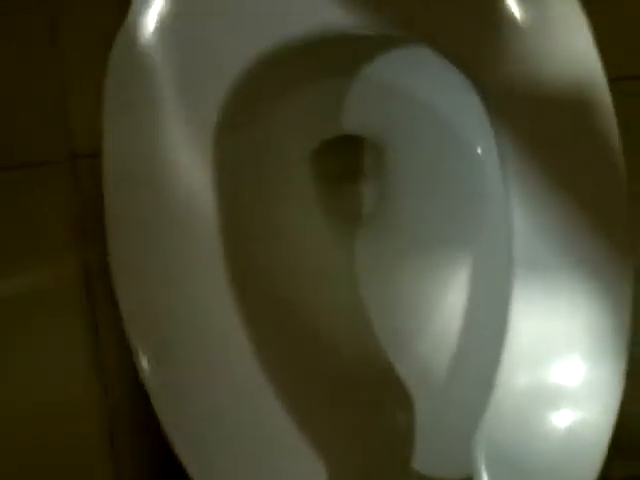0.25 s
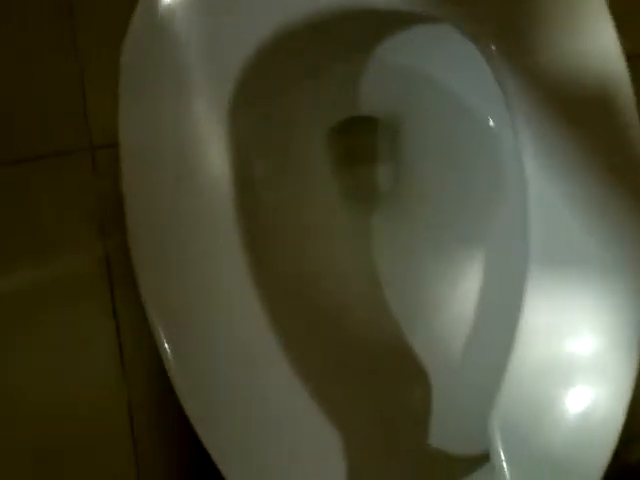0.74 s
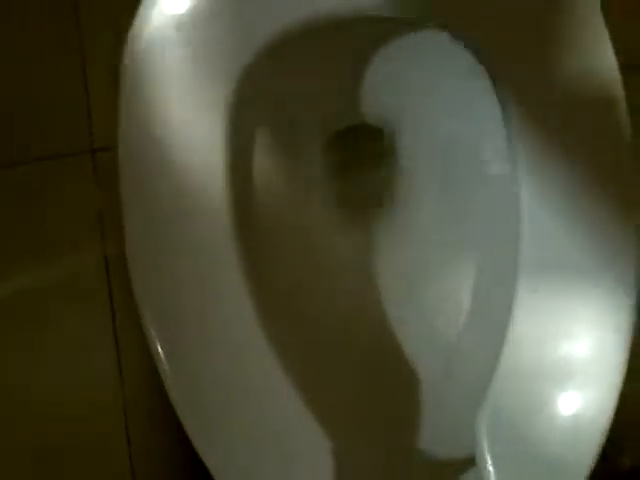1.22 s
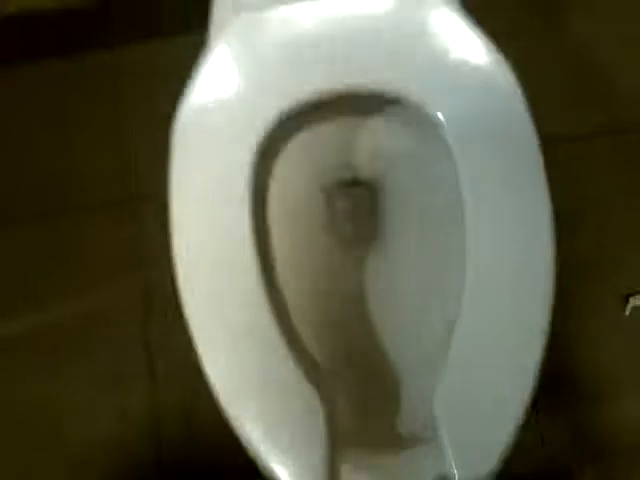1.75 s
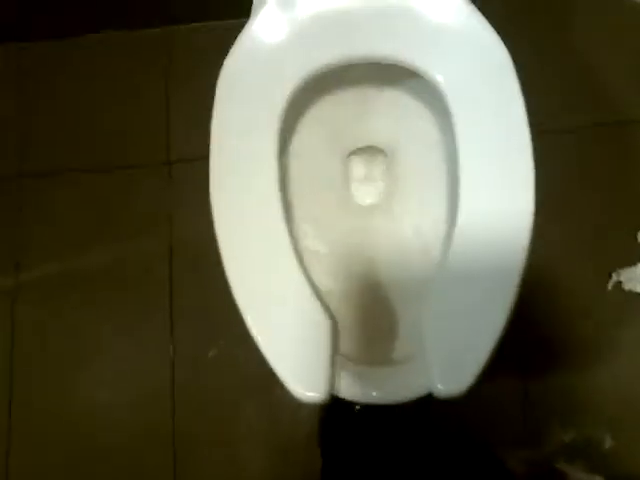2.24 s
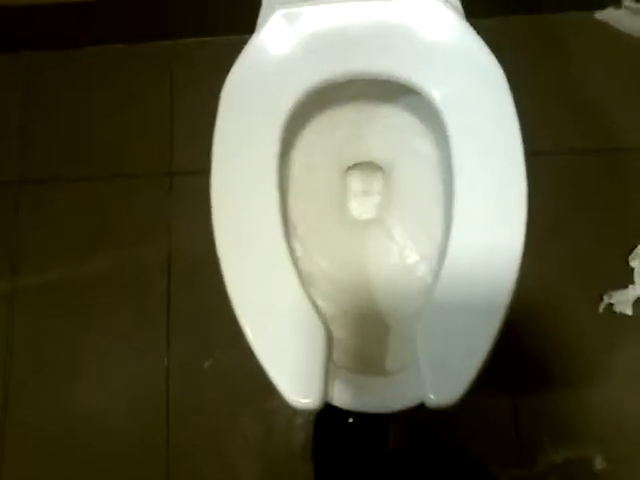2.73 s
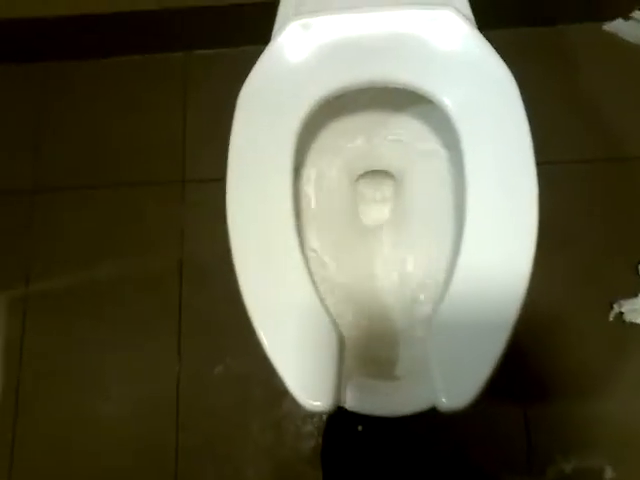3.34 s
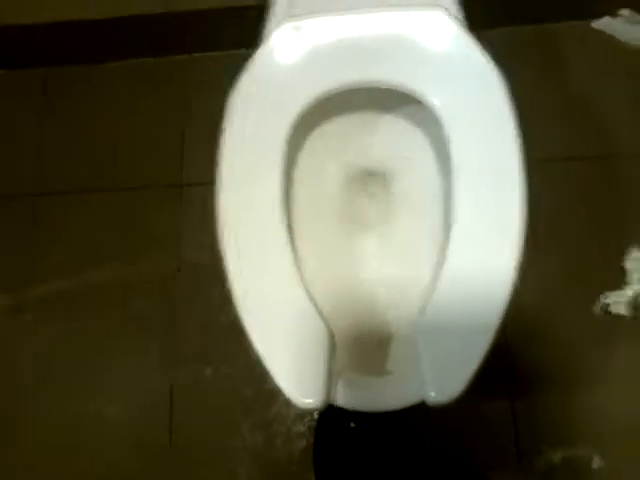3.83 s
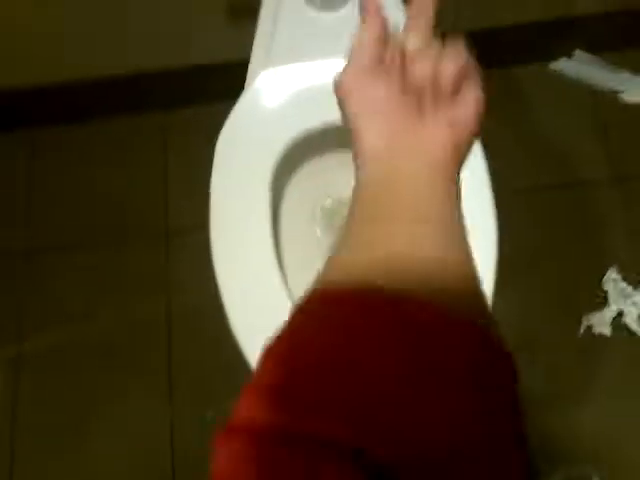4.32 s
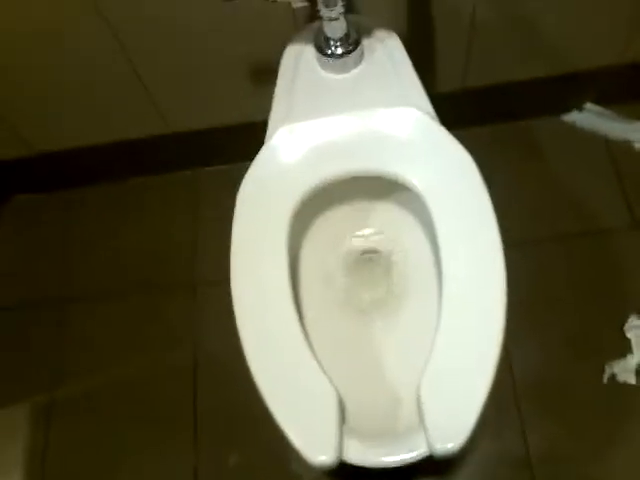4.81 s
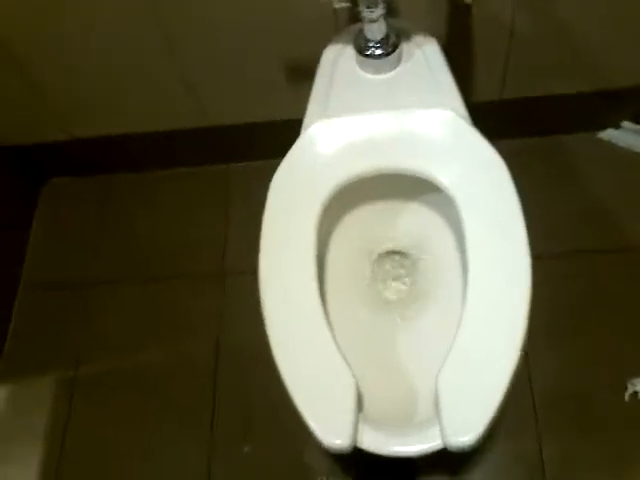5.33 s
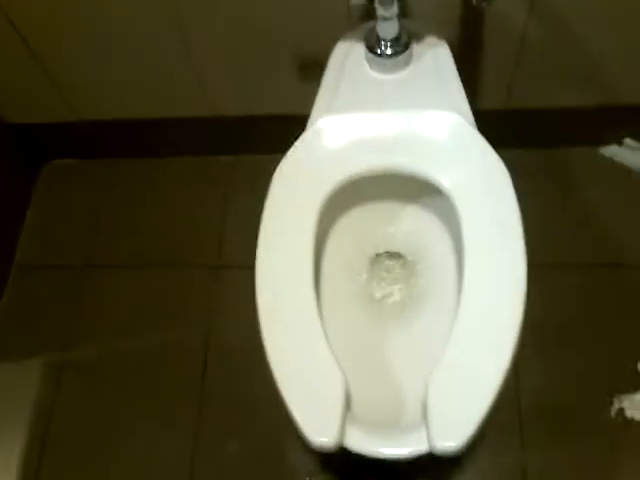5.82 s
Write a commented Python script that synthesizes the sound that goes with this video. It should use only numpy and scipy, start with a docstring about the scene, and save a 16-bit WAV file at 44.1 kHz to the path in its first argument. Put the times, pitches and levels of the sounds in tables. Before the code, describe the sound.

A toilet handle clicks twice, the pipe groans and whistles, a loud flush rushes and sprays, then drains away into drips and gulps in a tiled restroom.

```python
"""Water from a pressure flush valve churns and gushes in a bowl and sprays from the rim (patchy noise and bubbles),
then drains away with splashes, drips, gulps and soft pips (noise bursts, damped sines).
A handle clicks twice first (noise bursts); the supply pipe groans and the valve whistles (resonant noise).
A tiled room answers (decaying noise tails) over a ventilation hum; one small microphone with a faint hiss."""
import sys
import numpy as np
from scipy import signal
from scipy.fft import rfft, irfft, next_fast_len
from scipy.io import wavfile
from scipy.ndimage import uniform_filter1d, map_coordinates

SR = 44100
rng = np.random.default_rng(int(sys.argv[2]) if len(sys.argv) > 2 else 0)


def wav_out(sig):
    """Save sig, one row per channel (or a flat mono array), as 16-bit PCM at SR to the path in sys.argv[1]."""
    wavfile.write(sys.argv[1], SR, np.round(np.clip(np.atleast_2d(sig).T, -1, 1) * 32767).astype(np.int16))


def voltage_ratio(decibels):
    """Convert decibels (scalar or array-like) to amplitude ratios, 20 dB per decade."""
    exponent = np.asarray(decibels, float) / 20
    return 10 ** exponent


N = 267246

# ventilation, both parts dipping low through the middle of the flush: time_s, duct_rumble_db, fan_hum_db
VENT_LEVELS = [(0, -44, -47.5), (.17, -42.5, -39.5), (.75, -46, -41.5), (1.1, -50, -40.5), (1.4, -58, -51),
               (2.3, -66, -50), (3.1, -61, -51.5), (3.7, -53, -47), (4.3, -46, -45), (4.6, -48, -44.5),
               (5.2, -49, -40.5), (5.5, -50, -43.5), (5.7, -47.5, -47), (6.06, -50, -43)]
# duct rumble spectrum: freq_hz, relative_density_db
DUCT_SPECTRUM = [(12, -30), (22, 6), (45, 12), (75, 4.5), (100, 6), (200, -37)]
# fan hum modes: centre_hz, width_hz, relative_db
FAN_MODES = [(128.5, 9.9, -1), (140.3, 16.3, 2), (165, 35, -12.5)]
# mains tone: pitch_hz, peak_over_duct_rumble_rms_db
MAINS_TONE = (59.3, -7)
# decay of the tiled room: freq_hz, t60_s
TILE_DECAY = [(200, 0.87), (2000, 0.43), (6000, 0.62), (14000, 0.097)]

# handle clicks: start_s, click_drive_db, lowest_hz, knock_drive_db
HANDLE_CLICKS = [(0.109, -19.5, 2380, -4.5), (0.1435, -9.5, 4370, -6)]
# valve body modes: centre_hz, width_hz, gain_db
VALVE_MODES = [(201, 53, 7.5), (966, 230, -6.5), (2970, 1100, -14.5), (4800, 550, -12)]

# falling drops: start_s, level_db, pitch_hz (near the end of the climb)
DRIP_EVENTS = [(3.559, -30, 4990), (3.624, -19, 7000), (3.68, -26, 4300), (3.747, -25, 2900),
               (3.756, -23, 6900), (3.82, -30, 2470), (3.88, -29.5, 3820), (4.03, -30, 3540),
               (4.054, -25, 3030), (4.068, -33.5, 2780), (4.08, -26.5, 6870), (4.511, -38, 2306),
               (4.647, -32, 3210), (5.05, -42, 9100), (5.137, -31.5, 4110), (5.141, -24.5, 5400),
               (5.274, -39, 3500), (5.339, -33, 4400), (5.459, -36, 7750), (5.53, -28.5, 5500),
               (5.615, -40, 3810), (5.676, -34.5, 6700)]
# splashes on the porcelain: start_s, crack_drive_db, spray_puff_db
SPLASH_EVENTS = [(3.555, -31, -52), (3.6346, -39, -29), (3.7544, -32, -30.5), (3.7694, -31, -34),
                 (3.904, -42, -46), (4.0277, -42, -35), (4.0517, -46, -42), (4.5211, -51, -40),
                 (4.643, -46, -47), (4.6937, -45, -60), (5.0494, -48, -54)]
# dull gulps in the trap: start_s, level_db, pitch_hz, decay_cycles
GULP_EVENTS = [(2.6, -26, 276, 8), (2.82, -23.5, 280, 9.5), (3.24, -23.5, 990, 7.4), (3.428, -29, 275, 3.9),
               (3.585, -25, 275, 4.3), (5.33, -40, 606, 11), (5.4, -39, 330, 6), (5.701, -32, 277, 6.8)]
# dull taps: start_s, strength_db, pitch_hz
TAP_EVENTS = [(4.5115, -26, 2000), (5.332, -27, 500), (5.697, -15.5, 1100)]
# runs of soft pips as the water settles: first_s, last_s, gap_s, level_db, pitch_hz
PIP_RUNS = [(4.202, 4.45, .05, -41.5, 1016), (4.208, 4.27, 0.034, -43, 1778), (4.474, 4.63, .038, -39, 433)]
PIP_DECAY_S = 0.046  # to 1/e

# air column of the supply pipe: centre_hz, width_hz, relative_db
PIPE_MODES = [(232, 22, -6), (282, 25, -14), (338.4, 33.6, 3.5), (375.3, 3.8, -1), (404.5, 27, -6),
              (644, 64, -11), (716, 32, -11.5), (1005, 20, -9), (1405, 15, -13), (1718, 8.5, -27)]
# cavity of bowl and trap once water fills the pipe: centre_hz, width_hz, relative_db
BOWL_MODES = [(238.7, 25, -9.5), (274.3, 38.3, 0), (347, 42, -6), (468.5, 34, -14.5), (637, 28, -17.5)]
# thin whistles of air in the valve: centre_hz, width_hz, relative_db
WHISTLE_MODES = [(2310, 68, -8), (3340, 30, -1), (4270, 80, -6), (5780, 80, -1), (7180, 110, -1),
                 (9000, 65, -10)]
# groan before its throbs and lumps: time_s, level_db
GROAN_LEVELS = [(0, -50.5), (.1, -54), (.24, -50), (.31, -37), (.45, -34.5), (.5, -18.5), (.62, -17.5),
                (.68, -18), (.76, -19), (.81, -21.5), (.86, -18), (.95, -18), (1.03, -25.5), (1.1, -24),
                (1.15, -21), (1.25, -19), (1.365, -20), (1.39, -32), (1.6, -30), (1.9, -35.5), (2.5, -36.5),
                (2.85, -34.5), (3.05, -45.5), (3.3, -48), (4.2, -46.5), (4.9, -52.5), (5.4, -46),
                (6.06, -51.5)]
# throbs of the air column: time_s, over_groan_db
THROB_EVENTS = [(.602, 5.5), (.655, 2), (.77, 3.5), (.9, 1), (1.2, 4.5), (1.245, 5), (1.3, 1), (1.35, 4.5)]
THROB_HALF_S = 0.015
VALVE_OPENS_S, PIPE_FILLS_S, SWITCH_HALF_S = 0.5, 1.39, 0.03
AIR_SHARE, IDLE_AIR_SHARE = 0.88, 0.083  # of groan power, with air in the pipe and without
WHISTLE_DB, WHISTLE_FADE_DB_PER_S = -29, 11  # from the opening of the valve

# churn spectrum, big bubbles: freq_hz, relative_density_db
CHURN_SPECTRUM = [(250, -52), (480, 3), (700, 4.5), (1100, 4.5), (1500, -20), (2500, -47)]
# dull gush spectrum: freq_hz, relative_density_db
DULL_GUSH_SPECTRUM = [(800, -34), (1300, 6), (1700, 2.5), (2200, 2), (3000, -22)]
# bright gush spectrum: freq_hz, relative_density_db
BRIGHT_GUSH_SPECTRUM = [(1300, -36), (2100, -5.5), (2700, -1), (3300, -3.5), (4200, -5), (6000, -50)]
# rim spray spectrum: freq_hz, relative_density_db
SPRAY_SPECTRUM = [(2000, -23.5), (3500, -8), (5000, -4), (6600, 1), (7400, -0.5), (8600, -11),
                  (11000, -48.5)]
# fine mist spectrum: freq_hz, relative_density_db
MIST_SPECTRUM = [(6000, -22.5), (8800, 0.5), (10000, -2), (12000, -11.5), (15000, -15), (16500, -39)]
# water through the rim jets, before surge and mix: time_s, spray_db, mist_over_spray_db
JET_LEVELS = [(0, -50, -22), (.055, -55, -24), (.078, -45, -28), (.1, -50, -24), (.17, -39, -9),
              (.3, -37.5, -2), (.44, -35, -15), (.475, -34.5, -10), (.51, -23, -10), (.67, -24.5, -6.5),
              (.73, -19, -9.5), (.85, -19.5, -11), (1.12, -16, -20.5), (1.34, -18, -16), (1.43, -17, -13.5),
              (1.95, -18.5, -14), (2.75, -16, -14), (2.98, -16, -15.5), (3.33, -23.5, -20.5),
              (3.58, -36, -18), (4, -43.5, -21), (4.3, -45, -22), (4.8, -48, -18), (5.6, -49, -14),
              (5.81, -59.5, -11), (6.06, -53, -18)]
# water tumbling in the bowl, before surge and mix: time_s, churn_db, gush_db, gush_brightness (0-1)
BOWL_LEVELS = [(0, -61, -53.5, 0.06), (.1, -52, -60, 0.3), (.17, -51, -57, 0.6), (.34, -45.5, -47, 0.83),
               (.46, -35.5, -42, 0.44), (.56, -32, -37, 0.75), (.75, -30.5, -30.5, 0.73),
               (.98, -25, -23, 0.07), (1.16, -29, -25.5, 0.56), (1.36, -26.5, -25, 0.57),
               (1.43, -26, -20, 0.17), (1.62, -29, -20.5, 0.75), (2.08, -35, -27, 0.72),
               (2.75, -33, -26.5, 0.95), (3, -38.5, -27, 0.75), (3.6, -42, -37.5, 0.46),
               (3.85, -45, -42, 0.4), (4.3, -52.5, -46.5, 0.15), (4.8, -52.5, -55.5, 0.44),
               (5.6, -57, -55, 0.26), (6.06, -60.5, -59, 0.3)]
# heavier sloshes in the bowl: time_s, over_churn_db, over_gush_db
SLOSH_EVENTS = [(.72, 9.5, -2), (1.29, 8, 1.5), (1.41, 5, 1), (1.55, 1.5, 4), (1.931, 6.5, 8), (2.41, 5, 0),
                (2.75, 8, 3), (3.6, 4.5, -1.5)]
SLOSH_HALF_S = 0.017
PUFF_RISE_S, PUFF_T60_S, PUFF_MIST_DB = 0.0025, 0.48, -16

# microphone hiss spectrum: freq_hz, relative_density_db
HISS_SPECTRUM = [(2000, -7), (8000, -2), (12000, -4), (16000, -6)]
HISS_DB, TOP_HZ, CEILING = -71, 16100, 0.66  # ceiling: linear amplitude


def unit(x):
    """Scales to rms 1."""
    return x / np.sqrt(np.mean(x ** 2) + 1e-20)


def along(points, hz):
    """Interpolates (freq_hz, value) points on a log axis."""
    f, v = np.transpose(points)
    return np.interp(np.log(hz + 1), np.log(f + 1), v)


def curves(table):
    """One value per sample for each column after the time."""
    s, *cols = np.transpose(table)
    return [np.interp(np.arange(N) / SR, s, c) for c in cols]


def swells(rows, half_s):
    """Gaussian swells in dB, down to 1/e at half_s; one curve per column after the time."""
    s, *db = np.transpose(rows)
    return np.array(db) @ np.exp(-((np.arange(N) / SR - s[:, None]) / half_s) ** 2)


def wobble(rate_hz):
    """Smooth random curve, rate_hz knots a second."""
    knots = rng.standard_normal(int(N * 60 / SR) + 4)
    return map_coordinates(knots, [np.arange(N) * rate_hz / SR])


def step(at_s):
    """Rises smoothly from 0 to 1 around at_s."""
    return 0.5 + 0.5 * np.tanh((np.arange(N) / SR - at_s) / SWITCH_HALF_S * 2)


def filtered(x, response):
    """Applies a response of frequency."""
    m = next_fast_len(N + SR // 2)
    return irfft(rfft(x, m) * response(np.fft.rfftfreq(m, 1 / SR)), m)[:N]


def coloured_noise(spectrum):
    """Gaussian noise of rms 1 with the spectrum's colour."""
    return unit(filtered(rng.standard_normal(N), lambda f: voltage_ratio(along(spectrum, f))))


def ring(modes):
    """Response of fixed modes; two resonators in series give each one steep skirts."""
    def resonator(f, centre_hz, width_hz):
        return 1j * f * width_hz / (centre_hz ** 2 - f * f + 1j * f * width_hz)
    return lambda f: sum(voltage_ratio(db) * resonator(f, c, w) * resonator(f, c, 2 * w) for c, w, db in modes)


def resonant(modes, steady):
    """Noise of rms 1 ringing in the modes; steady (0-1) evens out its swells."""
    x = filtered(rng.standard_normal(N), ring(modes))
    swell = uniform_filter1d(uniform_filter1d(np.abs(x), SR // 40), SR // 40)
    return unit(x / (swell + 1e-9) ** steady)


def bursts(rows, t60_s):
    """Decaying noise bursts at (start_s, drive_db)."""
    out, t = np.zeros(N + SR), np.arange(SR // 10) / SR
    for s, db in rows:
        out[round(s * SR):][:len(t)] += voltage_ratio(db - 60 * t / t60_s) * rng.uniform(-0.95, 1, len(t))
    return out[:N]


def plinks(s, db, hz, cycles, rise, onset):
    """Damped bubble sines, pitch climbing by rise as the surface nears; decay and onset in cycles."""
    size = 1500
    turns = np.arange(size) / SR * hz[:, None]
    age = turns / np.reshape(cycles, (-1, 1))
    shape = np.exp(-age) * (1 - np.exp(-turns / onset)) * np.hanning(2 * size)[size:]
    wave = voltage_ratio(db)[:, None] * shape * np.sin(2 * np.pi * turns * (1 + rise * np.tanh(age)))
    at = np.round(s * SR).astype(int)[:, None] + np.arange(size)
    return np.bincount(at.ravel(), wave.ravel(), N + size)[:N]


def water(spectrum, patchy_db, count, centre_hz, spread, cycles, size_db, share):
    """Coloured patchy noise plus random bubbles, rms 1; spread in log pitch, share is bubble power."""
    z = signal.stft(rng.standard_normal(N), nperseg=512)[2]
    field = uniform_filter1d(uniform_filter1d(rng.standard_normal(z.shape), 4, 0), 14, 1)
    noise = signal.istft(z * voltage_ratio(patchy_db * unit(field)), nperseg=512)[1][:N]
    coloured = unit(filtered(noise, lambda f: voltage_ratio(along(spectrum, f))))
    when_s = rng.random(count) * N / SR
    hz = np.clip(centre_hz * np.exp(spread * rng.standard_normal(count)), 100, 16000)
    size = np.minimum(rng.exponential(size=count), 3.5)  # no bubble far above the crowd
    bubbles = plinks(when_s, size_db * size, hz, cycles, rise=0.04, onset=1.8)
    return unit(np.sqrt(1 - share) * coloured + np.sqrt(share) * unit(bubbles))


def ventilation():
    """Broadband duct rumble, a fan's resonant hum and a steady-pitched mains sine."""
    rumble_db, hum_db = curves(VENT_LEVELS) + 1.07 * np.array([wobble(4.1), wobble(3.8)])
    mains_hz, over_rumble_db = MAINS_TONE
    mains = voltage_ratio(over_rumble_db + rumble_db) * np.sin(2 * np.pi * mains_hz * np.arange(N) / SR)
    rumble = voltage_ratio(rumble_db) * coloured_noise(DUCT_SPECTRUM)
    return rumble + voltage_ratio(hum_db) * resonant(FAN_MODES, steady=0.11) + mains


def room(x):
    """Tile echo with a decay per frequency; tails crossfade every 0.25 s as the microphone moves."""
    hop, out = SR // 4, np.zeros(N + 2 * SR)
    padded = np.pad(x, (hop, 2 * hop))
    for start in range(0, N + hop, hop):
        hz, t, z = signal.stft(rng.standard_normal(SR // 2), SR, nperseg=256)
        decay = voltage_ratio(-60 * t / along(TILE_DECAY, hz)[:, None])
        tail = signal.istft(z * decay, SR, nperseg=256)[1]
        piece = padded[start:start + 2 * hop] * np.hanning(2 * hop)
        echo = signal.fftconvolve(piece, tail / np.linalg.norm(tail))
        out[start:start + len(echo)] += echo
    return out[hop - 200:][:N]  # echo lags 200 samples


def handle():
    """Two metal clicks, the second brighter; each knocks the modes of the valve body."""
    def click(start_s, drive_db, low_hz):
        def band(f):
            return 1 / (1 + (low_hz / (f + 1)) ** 10) / (1 + (f / 10000) ** 8)
        return filtered(bursts([(start_s, drive_db)], t60_s=0.029), band)
    clicks = sum(click(*row[:3]) for row in HANDLE_CLICKS)
    knocks = bursts([(s, knock_db) for s, _, _, knock_db in HANDLE_CLICKS], t60_s=0.075)
    return clicks + filtered(knocks, ring(VALVE_MODES))


def drips():
    """Drops sound as climbing damped sines; each throws up eight droplets at nearby pitches."""
    s, db, hz = np.transpose(DRIP_EVENTS)
    main = plinks(s, db, hz / 1.05, cycles=16, rise=0.06, onset=3)
    late, off = rng.random((len(s), 8)), rng.standard_normal((len(s), 8))
    droplet_s = s[:, None] + 0.02 * late
    droplet_db = db[:, None] - 5 - 8 * late
    droplet_hz = hz[:, None] * np.exp(0.1 * off)
    return main + plinks(droplet_s.ravel(), droplet_db.ravel(), droplet_hz.ravel(),
                         cycles=9, rise=0.05, onset=1.5)


def splashes():
    """Water cracking on porcelain: short noise bursts in a broad treble band."""
    cracks = bursts([row[:2] for row in SPLASH_EVENTS], t60_s=0.03)
    return filtered(cracks, lambda f: voltage_ratio(9.0) * f / (f + 3000) / (1 + (f / 11000) ** 3))


def gulps():
    """Dull damped sines of fixed pitch in the trap."""
    s, db, hz, cycles = np.transpose(GULP_EVENTS)
    return plinks(s, db, hz, cycles, rise=0, onset=0.65)


def taps():
    """Dull taps: sines damped within a fraction of a cycle."""
    s, db, hz = np.transpose(TAP_EVENTS)
    return plinks(s, db, hz, cycles=0.25, rise=0, onset=0.04)


def pips():
    """Each run repeats one soft damped sine at slightly uneven pace and strength."""
    first, last, gap, db, hz = np.transpose(PIP_RUNS)[:, :, None]
    late, loud = rng.standard_normal((2, len(PIP_RUNS), 8))
    s = first + gap * np.arange(8) + 0.003 * late
    db = np.where(s < last, db + 1.5 * loud, -200)  # silent after the last
    hz = hz + 0 * s
    return plinks(s.ravel(), db.ravel(), hz.ravel(), PIP_DECAY_S * hz.ravel(), rise=0, onset=0.71)


def groan():
    """Driven air sounds the pipe modes until water fills it, leaving mostly the bowl's hollow."""
    airy = 1 - step(PIPE_FILLS_S)
    share = IDLE_AIR_SHARE + (AIR_SHARE - IDLE_AIR_SHARE) * airy
    pipe = np.sqrt(share) * resonant(PIPE_MODES, steady=0.57)
    bowl = np.sqrt(1 - share) * resonant(BOWL_MODES, steady=0.12)
    lumps_db = 2.7 * (1 - airy) * wobble(11)
    throbs_db = swells(THROB_EVENTS, THROB_HALF_S)[0]
    return voltage_ratio(curves(GROAN_LEVELS)[0] + lumps_db + throbs_db) * (pipe + bowl)


def whistles():
    """Air in the open valve excites narrow modes, thinning out until water fills the pipe."""
    airy = step(VALVE_OPENS_S) * (1 - step(PIPE_FILLS_S))
    fade_db = WHISTLE_FADE_DB_PER_S * (np.arange(N) / SR - VALVE_OPENS_S)
    level = airy * voltage_ratio(WHISTLE_DB - fade_db)
    return level * resonant(WHISTLE_MODES, steady=0) * voltage_ratio(1.7 * wobble(25.4))


def puffs():
    """Level of the spray each splash throws up: fast rise, exponential decay, powers summed."""
    s, _, puff_db = np.transpose(SPLASH_EVENTS)[:, :, None]
    age_s = np.maximum(np.arange(N) / SR - s, 0)
    level = voltage_ratio(puff_db - 60 * age_s / PUFF_T60_S) * (1 - np.exp(-age_s / PUFF_RISE_S))
    return np.sqrt((level ** 2).sum(0))


def flush():
    """Big bubbles churn, jets gush, fine drops spray; a shared surge moves them together."""
    surge, heave, puff = wobble(9.14), wobble(14), puffs()
    spray_db, mist_db = curves(JET_LEVELS)
    churn_db, gush_db, bright_share = curves(BOWL_LEVELS)
    churn_db, gush_db = [churn_db, gush_db] + swells(SLOSH_EVENTS, SLOSH_HALF_S)

    churn = water(CHURN_SPECTRUM, patchy_db=2.6, count=700, centre_hz=845, spread=0.3,
                  cycles=8, size_db=2.5, share=0.07)
    dull = water(DULL_GUSH_SPECTRUM, patchy_db=3.0, count=1200, centre_hz=1667, spread=0.171,
                 cycles=15, size_db=-1.0, share=0.36)
    bright = water(BRIGHT_GUSH_SPECTRUM, patchy_db=2.0, count=1800, centre_hz=2900, spread=0.1905,
                   cycles=6.6, size_db=3.5, share=0.2)
    gush = np.sqrt(1 - bright_share) * dull + np.sqrt(bright_share) * bright
    spray = water(SPRAY_SPECTRUM, patchy_db=1.1, count=3500, centre_hz=6000, spread=0.14,
                  cycles=9, size_db=1.2, share=0.12)
    mist = water(MIST_SPECTRUM, patchy_db=1.2, count=3000, centre_hz=10500, spread=0.15,
                 cycles=5, size_db=1, share=0.03)

    churn_level = voltage_ratio(churn_db + 0.21 * surge + 1.04 * heave)
    gush_level = voltage_ratio(gush_db + 0.27 * surge + 0.9 * heave)
    spray_level = np.hypot(voltage_ratio(spray_db + 0.49 * surge), puff)
    mist_level = np.hypot(voltage_ratio(spray_db + mist_db + 0.86 * surge), voltage_ratio(PUFF_MIST_DB) * puff)
    return churn_level * churn + gush_level * gush + spray_level * spray + mist_level * mist


def scene():
    """Everything reaches one microphone, the water sources also off the tiles."""
    near = gulps() + pips() + taps()
    hits = handle() + drips() + splashes()
    flow, pipe = flush(), groan() + whistles()
    echo = room(voltage_ratio(-2.0) * hits + voltage_ratio(-5.0) * near + voltage_ratio(-11.5) * flow + voltage_ratio(-11.5) * pipe)
    mono = hits + near + voltage_ratio(-2.0) * flow + pipe + echo + ventilation()
    return np.array([mono, mono])


def band_limit(x):
    """A steep low-pass at the top of the band."""
    return signal.sosfilt(signal.butter(12, 16160, fs=SR, output="sos"), x)


def record(dry):
    """Adds microphone hiss, band-limits, and rounds off peaks as the recorder does."""
    hiss = voltage_ratio(HISS_DB) * coloured_noise(HISS_SPECTRUM)
    mono = filtered(dry[0] + hiss, lambda f: f < TOP_HZ)
    mono = mono / (1 + np.abs(mono / CEILING) ** 8) ** (1 / 8)
    return band_limit(np.array([mono, mono]))


dry = scene()
out = record(dry)
wav_out(out)
```